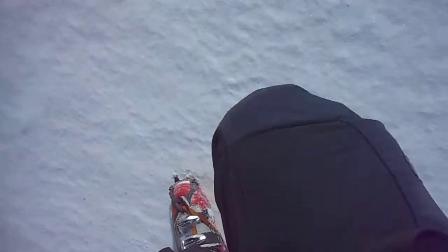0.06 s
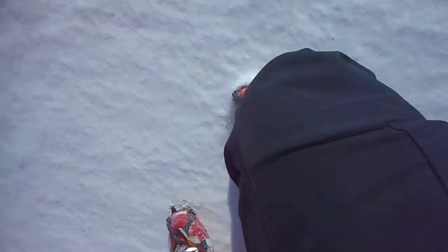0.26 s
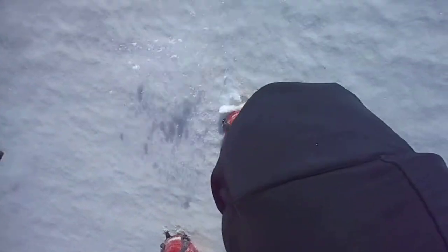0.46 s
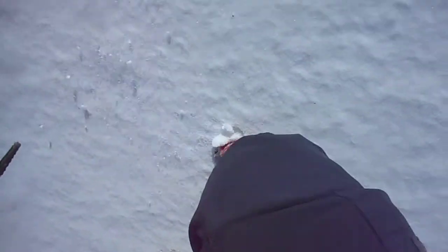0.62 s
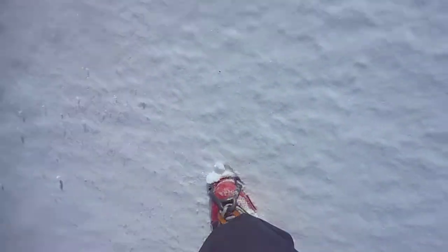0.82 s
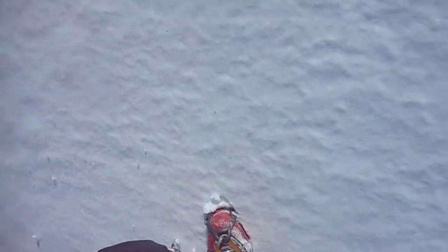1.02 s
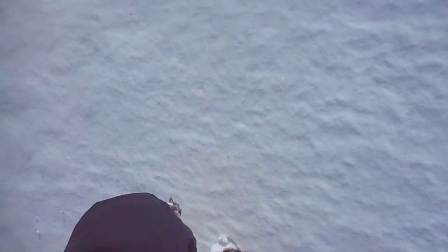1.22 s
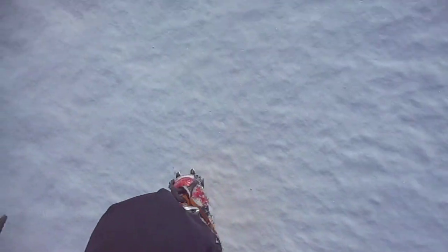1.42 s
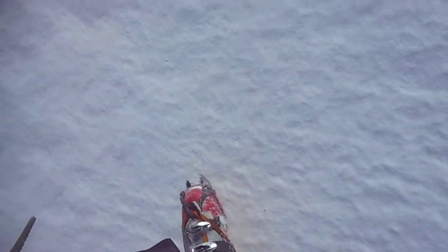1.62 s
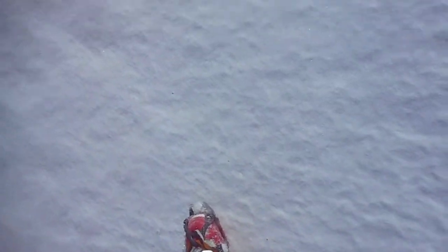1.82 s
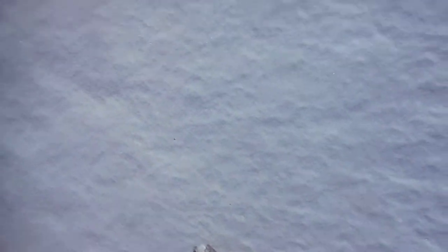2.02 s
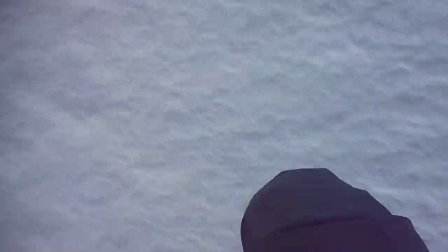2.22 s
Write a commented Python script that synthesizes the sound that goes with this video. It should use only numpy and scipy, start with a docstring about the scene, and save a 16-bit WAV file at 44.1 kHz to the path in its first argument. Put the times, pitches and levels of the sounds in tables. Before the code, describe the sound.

Spiked boots crunch into hard snow in several close, crackling kicks with sharp snaps and knocks. Between kicks, crumbs trickle downhill and snow scuffs softly; two short taps come near the end. Faint wind brushes the microphone outdoors.

```python
"""Boots with crampons climb a steep slope of hard snow, heard from the climber's chest.
Each kick crushes the crust in bursts of tiny fractures that set the steel frame ringing faintly,
with single snaps and knocks among them. Loose crumbs trickle downhill, soft scuffs, a tick and two
short taps fall between the kicks, and light wind nudges the microphone."""
import sys
import numpy as np
from scipy import signal
from scipy.fft import rfft, irfft, next_fast_len
from scipy.io import wavfile

SR = 44100
rng = np.random.default_rng(int(sys.argv[2]) if len(sys.argv) > 2 else 0)


def dump_mix(stems):
    """Bounce the given channels to the path in sys.argv[1] as a 16-bit WAV at rate SR."""
    frames = np.atleast_2d(stems).T  # one column per channel
    limited = np.clip(frames, -1, 1)  # hard clip at full scale
    pcm = np.round(limited * 32767).astype(np.int16)
    wavfile.write(sys.argv[1], SR, pcm)


N = 103635
TOP_HZ = 10500

# tone of breaking crust: f/Hz, level/dB
CRUST_EQ = [(100, -33), (200, -22.5), (300, -12), (450, -4), (800, -3), (1400, -3), (2000, -1.3),
            (2650, -1), (3800, -5), (6400, -9.5), (8900, -16), (10400, -28)]
# airy tone of scuffed snow and wind hiss: f/Hz, level/dB
AIRY_EQ = [(280, -27), (540, -7), (1000, -3), (3000, -2), (5000, 0), (7200, -9), (9000, -10), (10500, -21)]


def undb(db):
    """Decibels to gain."""
    return 10 ** (np.asarray(db) / 20)


def unit(x):
    """Scale to rms 1."""
    return x / np.sqrt(np.mean(x ** 2))


def colour(x, eq, tilt_db=0, resonance_hz=None):
    """Causal EQ with a tilt per octave and a broad resonance; keeps the power of white noise."""
    size, resonance_db, width_octaves = 4096, 3.5, .6
    octave = np.log2(np.maximum(np.fft.rfftfreq(size, 1 / SR), 1))
    hz, db = np.array(eq).T
    low_cut = 12 * np.minimum(octave - np.log2(hz[0]), 0)
    high_cut = -60 * np.maximum(octave - np.log2(hz[-1]), 0)
    curve_db = np.interp(octave, np.log2(hz), db) + low_cut + high_cut + tilt_db * octave
    if resonance_hz:
        curve_db += resonance_db * np.exp(-((octave - np.log2(resonance_hz)) / width_octaves) ** 2)
    # minimum phase: nothing rings ahead of a click
    cepstrum = irfft(np.log(undb(curve_db)))
    cepstrum[1:size // 2] *= 2
    cepstrum[size // 2 + 1:] = 0
    response = irfft(np.exp(rfft(cepstrum)))
    return signal.fftconvolve(x, response / np.linalg.norm(response))[:len(x)]


def grains(per_s, scatter_db):
    """Grit at rms 1: random clicks of scattered size, per_s a second in each of four registers."""
    # crossovers between the registers: f/Hz
    crossovers = [1200, 3000, 5500]
    padded = next_fast_len(N)
    register = np.searchsorted(crossovers, np.fft.rfftfreq(padded, 1 / SR))
    spectrum = 0
    for k in range(len(crossovers) + 1):
        size = undb(scatter_db * np.clip(rng.standard_normal(N), -2, 2))
        clicks = (rng.random(N) < per_s / SR) * size * rng.choice([-1, 1], N)
        spectrum += rfft(clicks, padded) * (register == k)
    return unit(irfft(spectrum, padded)[:N])


def strokes(cues, eq, fractures):
    """Bursts of fractures that rise, hold and die away with the force on the snow."""
    t, out = np.arange(N) / SR, np.zeros(N)
    for at, rise, hold, fall, db, tilt_db, resonance_hz in cues:
        attack_db = -20 * np.maximum(at - t, 0) / rise
        release_db = -20 * np.maximum(t - at - hold, 0) / fall
        burst = undb(db + attack_db + release_db) * np.roll(fractures, rng.integers(N))
        out += colour(burst, eq, tilt_db, resonance_hz)
    return out


def crumbs():
    """Loosened grains patter down the crust, most of all after a kick."""
    # swell and ebb of the trickle: t/s, level/dB
    trickle = [(0, -51), (.35, -53), (.45, -44), (.55, -43), (.77, -40.5), (.88, -44), (1.01, -52),
               (1.16, -47.5), (1.25, -50.5), (1.44, -55), (1.72, -43), (2.03, -56), (2.35, -57)]
    # tone of the crumbs: f/Hz, level/dB
    crumb_eq = [(150, -18), (480, -5), (800, 0), (1500, -3.5), (2700, -3), (4000, -9), (8700, -16),
                (10400, -28)]
    at, db = np.array(trickle).T
    flow = undb(np.interp(np.arange(N) / SR, at, db))
    return colour(flow * grains(per_s=2000, scatter_db=3.5), crumb_eq)


def wind():
    """A faint rumble with short puffs, and a thin hiss of air over the slope."""
    # low puffs on the microphone: t/s, level/dB
    puffs = [(.125, -61), (.32, -58), (.51, -62), (.595, -57), (.77, -60), (.882, -52), (.95, -55),
             (2.16, -62)]
    # tone of the rumble: f/Hz, level/dB
    rumble_eq = [(20, -7), (50, -7), (80, 0), (170, -6), (450, -28)]
    breeze_db, hiss_db, puff_s = -77, -55, .024
    t = np.arange(N) / SR
    force = undb(breeze_db) + sum(undb(db) * np.exp(-((t - at) / puff_s) ** 2) for at, db in puffs)
    hiss = undb(hiss_db) * colour(rng.standard_normal(N), AIRY_EQ)
    rumble = unit(colour(rng.standard_normal(N), rumble_eq))
    return force * rumble + hiss


def snaps():
    """A sharp crack and a few heavily damped cycles of the boot or crust that gave way."""
    # ice snaps and boot knocks: t/s, level/dB, f/Hz, crack relative to level/dB
    hits = [(.0880, -30, 1700, -8), (.2782, -14.5, 1300, -1), (.3272, -24, 1250, 5), (.390, -33, 640, -1),
            (.431, -37, 560, 7), (.467, -30, 750, 8), (.512, -32, 900, 9), (.534, -31, 750, 8),
            (.7452, -17.5, 1400, -3), (.7458, -15.5, 760, -11), (.867, -32, 1700, -2), (.868, -41, 260, -7),
            (1.0882, -24, 520, 5), (1.116, -32, 470, -1), (1.142, -35, 850, -2), (1.294, -42, 4000, 5),
            (1.5155, -17, 1650, -4), (1.5445, -22, 410, -13), (1.667, -20.5, 850, 2),
            (1.7275, -28, 2500, 7), (2.0798, -21.5, 1100, 1)]
    crack_s, band_ratio, ring_cycles, damping = .0007, 3.0, .65, .3
    t, out = np.arange(SR // 20) / SR, np.zeros(N)
    for at, db, hz, crack_db in hits:
        peak_s = ring_cycles / hz * undb(-damping * crack_db)  # a harder crack leaves a shorter ring
        ring = t / peak_s * np.exp(1 - t / peak_s) * np.sin(2 * np.pi * hz * t)
        edges_hz = [hz / band_ratio, min(hz * band_ratio, TOP_HZ)]
        band = signal.butter(2, edges_hz, "band", fs=SR, output="sos")
        burst = rng.standard_normal(len(t)) * t * np.exp(-t / crack_s)
        crack = signal.sosfilt(band, colour(burst, CRUST_EQ))
        crack *= undb(crack_db) / np.abs(crack).max()
        start = int(at * SR)
        out[start:start + len(t)] += undb(db) * (signal.sosfilt(band, ring) + crack)
    return out


def scuffs_and_taps():
    """Soft brushes over the snow, a bright tick, and two short taps like a pole or axe being planted."""
    # touches: full force t/s, 20 dB rise/s, hold/s, 20 dB fall/s, level/dB, tilt/(dB/oct), resonance f/Hz
    touches = [(.16, .04, .02, .11, -42.5, -.3, 4500), (.372, .03, .05, .08, -46, -.7, 400),
               (.714, .012, .004, .016, -39, 0, 8000), (.945, .07, .035, .12, -39.5, -1.5, 3000),
               (1.742, .04, .03, .12, -41.5, -1.4, 2000), (1.85, .1, .065, .15, -41.5, .6, 7000),
               (1.973, .016, .01, .028, -32.7, -1.5, 1050), (2.081, .024, .011, .009, -35.7, -2.4, 950),
               (2.28, .14, .04, .12, -51, -.3, 3500)]
    return strokes(touches, AIRY_EQ, grains(per_s=4000, scatter_db=3.5))


def crunches():
    """The spikes crush the crust; each patch rings broadly at its own pitch."""
    # bites: full force t/s, 20 dB rise/s, hold/s, 20 dB fall/s, level/dB, tilt/(dB/oct), resonance f/Hz
    bites = [(.243, .02, .014, .02, -28, 1, 3300), (.258, .012, .022, .036, -21.3, 0, 2700),
             (.284, .01, .01, .045, -28.5, -2.3, 850), (.535, .004, .004, .016, -33.3, -.3, 450),
             (.567, .014, .042, .1, -28.3, -.7, 2600), (.795, .07, .015, .07, -31, 0, 2600),
             (1.048, .02, .025, .05, -42.5, -1.2, 1500), (1.092, .008, .028, .09, -36.5, -.9, 430),
             (1.453, .002, .032, .02, -39.7, 1.1, 1500), (1.494, .008, .02, .02, -26.3, .8, 1800),
             (1.523, .012, .011, .03, -21.3, .3, 1700), (1.5455, .003, .004, .022, -20.5, -.3, 3000),
             (1.571, .02, .004, .05, -27, -.5, 2300), (1.599, .014, .005, .03, -25.8, 1.1, 1700),
             (1.63, .05, .015, .04, -28.5, -.4, 2500), (1.668, .004, .008, .035, -25.3, -.6, 2600),
             (1.692, .012, .012, .022, -28.4, -.3, 750), (1.901, .03, .011, .013, -38.5, -2.4, 1080)]
    return strokes(bites, CRUST_EQ, grains(per_s=3400, scatter_db=3.0))


def steel_ring(crunch):
    """The crunch plus the faint ring it shakes from the crampon, which the snow damps quickly."""
    # modes of the steel frame: f/Hz
    frame_modes = [1750, 2215, 2582, 2792, 4550]
    q, ring_db = 70, -8
    ring = sum(signal.lfilter(*signal.iirpeak(hz, q, fs=SR), crunch) for hz in frame_modes)
    return crunch + undb(ring_db) * ring


def scene():
    """Crunches, scuffs, taps, snaps, crumbs and wind in the open air, mono and without echo."""
    return (steel_ring(crunches()) + scuffs_and_taps() + snaps() + crumbs() + wind())[None]


def record(dry):
    """The small camera cuts the top end steeply."""
    return signal.sosfilt(signal.ellip(8, .2, 70, TOP_HZ, fs=SR, output="sos"), dry)


dry = scene()
out = record(dry)
dump_mix(out)
```